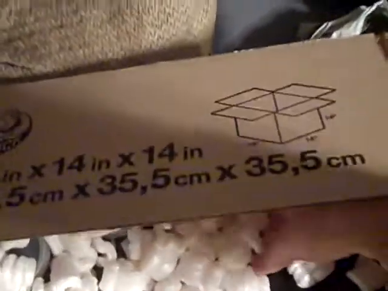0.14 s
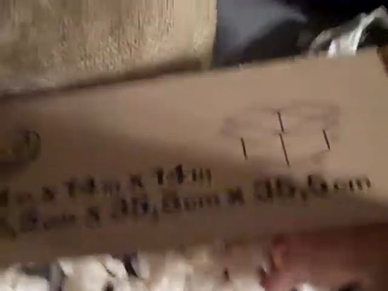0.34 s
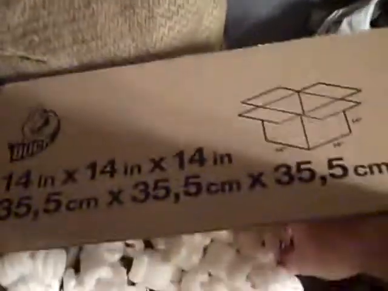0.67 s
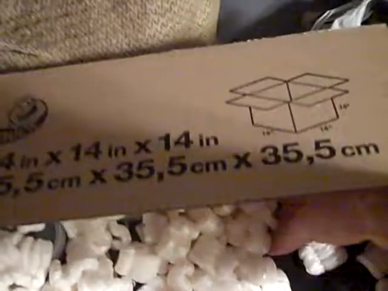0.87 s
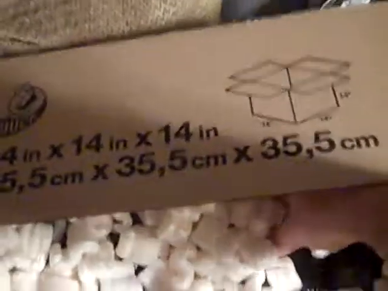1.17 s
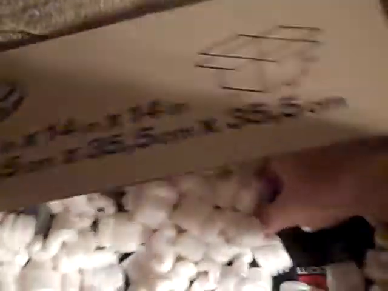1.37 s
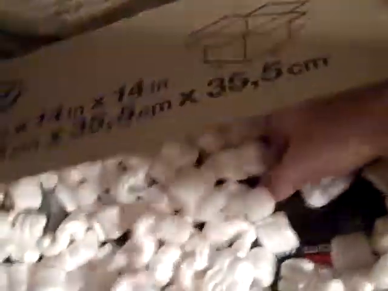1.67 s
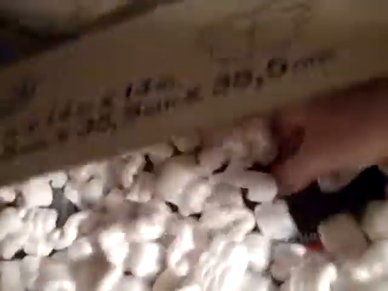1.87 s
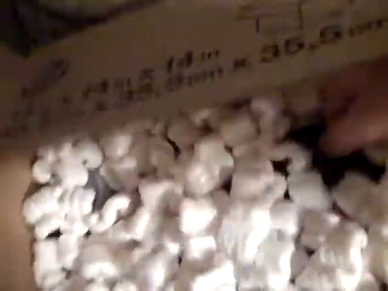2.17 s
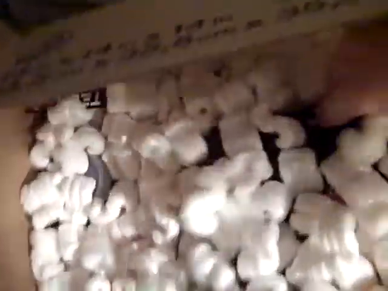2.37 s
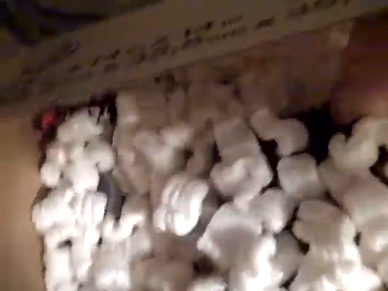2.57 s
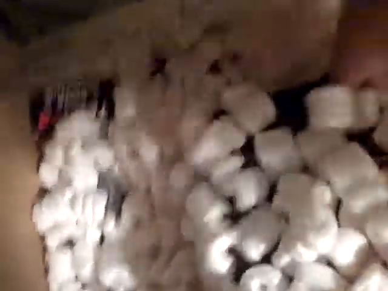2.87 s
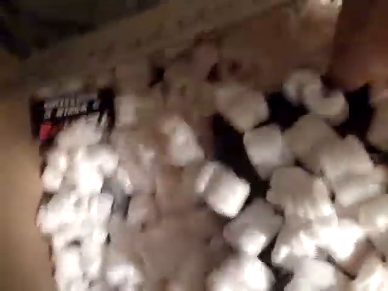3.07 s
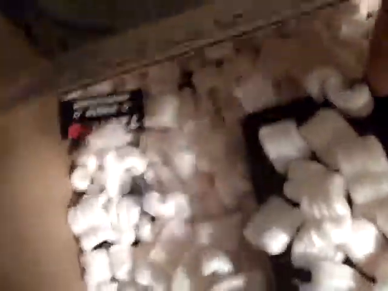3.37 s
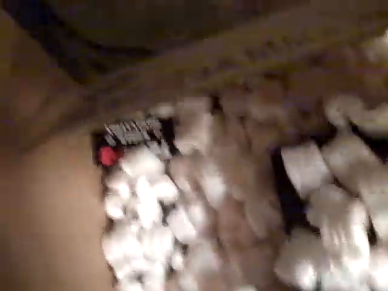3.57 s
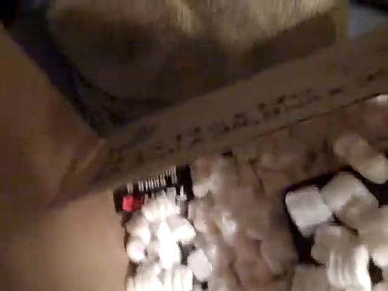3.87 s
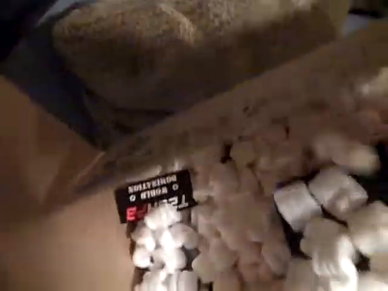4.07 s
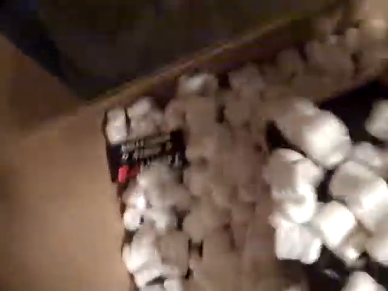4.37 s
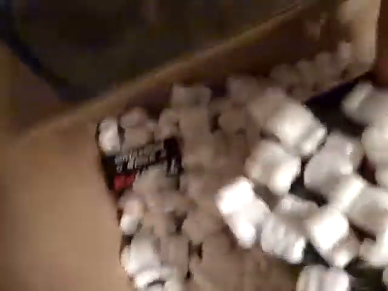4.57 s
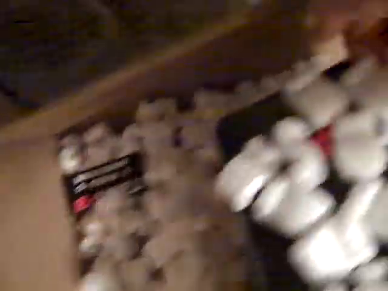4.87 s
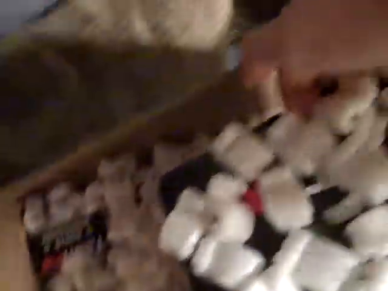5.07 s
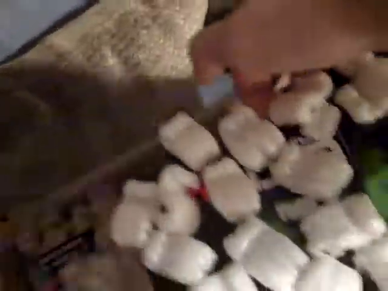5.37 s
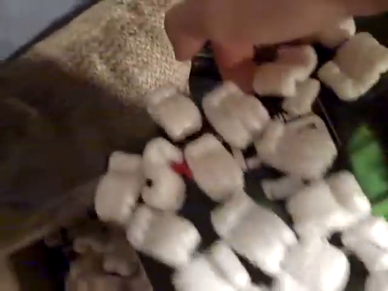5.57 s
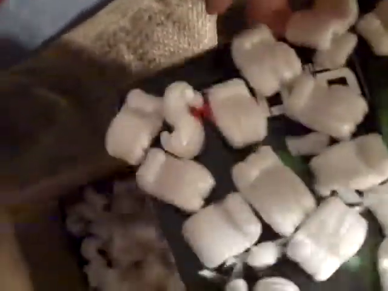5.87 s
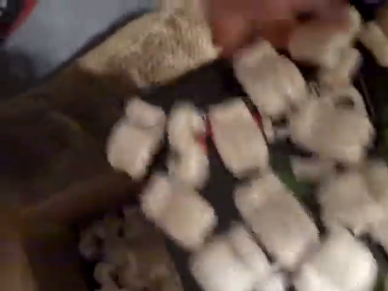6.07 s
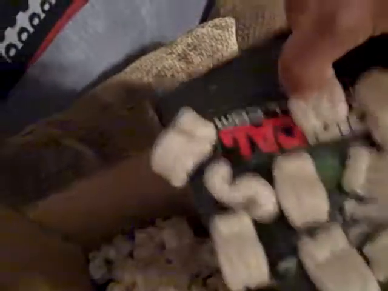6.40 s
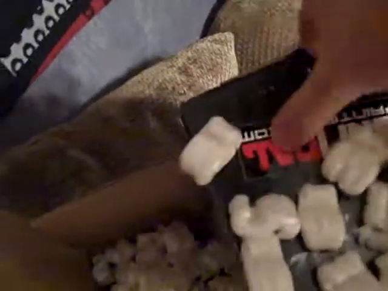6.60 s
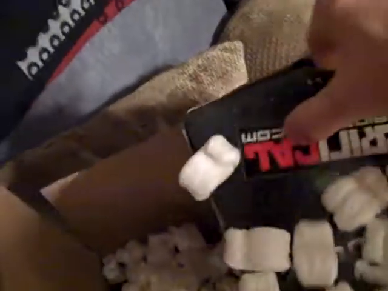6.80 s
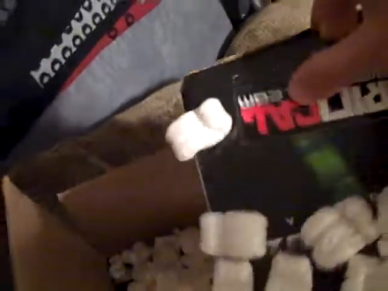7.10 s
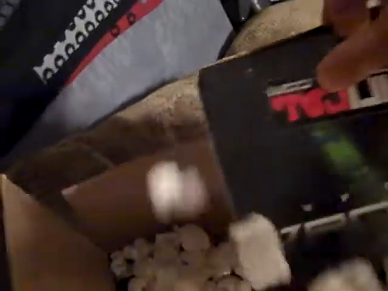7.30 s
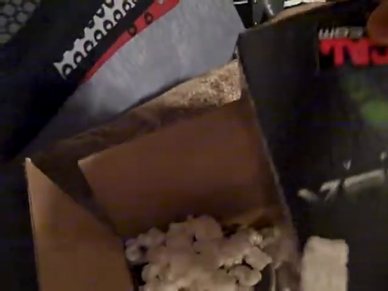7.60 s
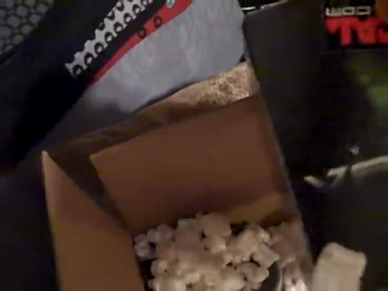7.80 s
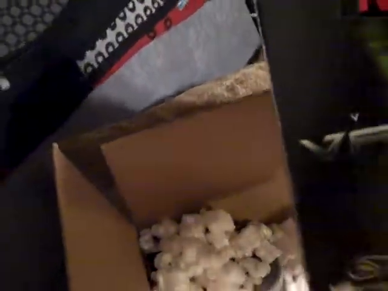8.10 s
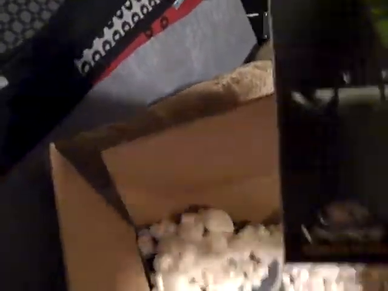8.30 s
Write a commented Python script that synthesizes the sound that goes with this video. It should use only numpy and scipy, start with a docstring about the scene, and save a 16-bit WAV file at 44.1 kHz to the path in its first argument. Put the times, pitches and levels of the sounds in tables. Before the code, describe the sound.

Close, dry rustling of loose foam peanuts in a cardboard box, swelling early, then breaking into knocks, squeaky slips and sparse clicks.

```python
"""A flat package drags through foam packing peanuts in a cardboard box, close to two small microphones.
Shoves over a steady drag drive dense random contacts: they scrape and hiss, the cavity colours, the walls boom.
Resonances struck by spikes and noise make the clicks, peanut taps and panel blows; decaying sines make the knocks.
Cardboard creaks and foam runs are trains of slips; wavering tones make a round low tap and two high squeaks.
Low grains rumble as the box sways, and a small room answers the single contacts."""
import sys
import numpy as np
from scipy import signal
from scipy.fft import rfft, irfft, next_fast_len
from scipy.io import wavfile
from scipy.ndimage import uniform_filter1d, map_coordinates

SR = 44100
rng = np.random.default_rng(int(sys.argv[2]) if len(sys.argv) > 2 else 0)


def dump_mix(stems):
    """Bounce the given channels to the path in sys.argv[1] as a 16-bit WAV at rate SR."""
    frames = np.atleast_2d(stems).T  # one column per channel
    limited = np.clip(frames, -1, 1)  # hard clip at full scale
    pcm = np.round(limited * 32767).astype(np.int16)
    wavfile.write(sys.argv[1], SR, pcm)


N = 372644
TIME = np.arange(N) / SR


def amp(db):
    """Decibels to gain."""
    return 10 ** (np.asarray(db) / 20)


def unit(x):
    """Scale to rms 1."""
    return x / np.sqrt(np.mean(x ** 2) + 1e-20)


def along(points, hz):
    """Read a curve of (Hz, value) points on a log frequency axis."""
    f, v = np.transpose(points)
    return np.interp(np.log(hz + 1), np.log(f + 1), v)


def curves(rows):
    """One value per sample for each column after the time."""
    s, *cols = np.transpose(rows)
    return [np.interp(TIME, s, c) for c in cols]


def filtered(x, response):
    """Filter x by a complex response of frequency, with zero padding for the tail."""
    n = x.shape[-1]
    m = next_fast_len(n + 4096)
    return irfft(rfft(x, m) * response(np.fft.rfftfreq(m, 1 / SR)), m)[..., :n]


def resonance(f, hz, width):
    """Causal response of one damped mode, with gain 1 at its pitch."""
    return 1j * f * width / (hz * hz - f * f + 1j * f * width)


def add(track, s, sound):
    """Mix a sound into a track at time s."""
    start = round(s * SR)
    track[..., start:start + sound.shape[-1]] += sound[..., :N - start]


# how alike the two ears are: pitch_hz [Hz], likeness [correlation]
EAR_LIKENESS = [(60, 0.39), (200, 0.87), (600, 0.85), (1200, 0.8), (2500, 0.7), (5200, 0.32), (9000, 0.12)]


def spread(pair, spectrum):
    """Colour two unrelated signals and share them between the ears: low mids most alike, treble apart."""
    def colour(f):
        turn = np.arccos(np.clip(along(EAR_LIKENESS, f), -1, 1)) / 2
        return amp(along(spectrum, f)) * np.array([np.cos(turn), np.sin(turn)])
    mid, side = filtered(pair, colour)
    return unit(np.array([mid + side, mid - side]))


def grains(rate, scatter_db, clump_db, clump_rate):
    """Two streams of tiny contacts of random size, in clumps as single peanuts catch and let go."""
    knots = rng.standard_normal(int(N * clump_rate / SR) + 4)
    clumps = amp(clump_db * map_coordinates(knots, [TIME * clump_rate], order=1))
    hit = rng.random((2, N)) < rate / SR
    size = amp(scatter_db * np.minimum(rng.standard_normal((2, N)), 2))
    sign = rng.choice([-1, 1], (2, N))
    return hit * size * sign * clumps / np.sqrt(rate)


def patches(pair, depth_db, cell_hz, cell_s):
    """Random brief spectral peaks and gaps make the noise patchy, at unchanged power."""
    hz, t, z = signal.stft(pair, SR, nperseg=512)
    field = rng.standard_normal((200, 1200))
    cells = np.meshgrid(hz / cell_hz, t / cell_s, indexing="ij")
    pattern = map_coordinates(field, cells, order=1, mode="wrap")
    gain = amp(np.interp(t, TIME, depth_db) * pattern)
    gain = gain / np.sqrt(np.mean(gain ** 2, axis=0))
    return signal.istft(z * gain, SR, nperseg=512)[1][:, :N]


# steady drag with loose foam sliding round the package: time_s [s], scrape_db [dB],
# then hiss_db, cavity_db, wall_db [dB relative to the scrape]
STEADY_DRAG = [(0, -52.5, 3.6, -11, -4.5), (.88, -57, 1, 1.5, -2), (1.2, -49, 1, -10, -15),
               (1.36, -49, 2.2, -5, -3), (1.6, -41, 4.6, -7, 0), (2.2, -41.5, 6.9, -1.5, -0.5),
               (2.62, -35.5, 4.2, -9, -10.5), (2.82, -41.5, 6.2, -3, -4), (3.2, -39, 6.1, -3, -7),
               (3.6, -45, 7.3, -1, -5.5), (3.9, -46.5, 7.5, -2.5, -7.5), (4.2, -47, 1.4, -5.5, -5.5),
               (4.28, -39.5, 5, -5, -5), (4.7, -37.5, 5.3, -4, -5), (5.25, -39, 2.7, -5.5, -5.5),
               (5.78, -36, 6.6, -3.5, -3.5), (6.03, -39, 11.8, -8, -13), (6.2, -39, 6.5, -5, -7),
               (6.52, -43, 11.3, -5, -2), (6.76, -48, 12.2, -9, -4.5), (7.12, -48.5, 8.1, -4.5, 0),
               (7.58, -50, 10.3, -5.5, -6.5), (7.82, -39.5, 8.1, -6, -14.5), (8.12, -49, 9.3, -8, -4.5),
               (8.45, -45.5, 4.6, -6, -10)]
# separate shoves, each swelling and fading: middle_s [s], length_s [s], scrape_db [dB],
# then hiss_db, cavity_db, wall_db [dB relative to the scrape]
SHOVES = [(0.064, 0.081, -32, 3.5, -11.5, -14), (0.193, 0.061, -36, 6, -13, -30),
          (0.318, 0.099, -42.5, 5.5, -10, -8), (0.463, 0.031, -40.5, 7, -12, -12),
          (0.653, 0.26, -43.5, 7.5, -11.5, -12), (0.987, 0.091, -36, 2, -12, -7),
          (1.065, 0.096, -34.5, -7, -6, -10), (1.162, 0.075, -37.5, 3.5, -5.5, -1.5),
          (1.435, 0.07, -37, -9, 0, -9), (1.518, 0.081, -32.5, -1.5, -4, -10),
          (1.64, 0.035, -30.5, 2, 0, -5), (1.702, 0.085, -23, 1, -0.5, -11),
          (1.844, 0.063, -21.5, -3, 0.5, -9), (1.983, 0.066, -22.5, -0.5, -4, -11.5),
          (2.117, 0.082, -31.5, 2.5, 0, -3), (2.261, 0.059, -32, 1, -3.5, -7),
          (2.41, 0.1, -24.5, -1, -1.5, -10.5), (2.536, 0.09, -29, -0.5, -3.5, -7.5),
          (2.731, 0.049, -29.5, 1, -2.5, -6), (2.88, 0.043, -24, 3.5, -9, -15.5),
          (2.992, 0.049, -30, 1, -7, -2.5), (3.129, 0.052, -35, 1, -4, -4),
          (3.286, 0.04, -38.5, -1, -18, -22), (3.446, 0.063, -39, 3.5, -10, -18),
          (4.063, 0.063, -43.5, 6, -15, 2), (4.372, 0.028, -39.5, 1, 2.5, 4),
          (4.54, 0.052, -37, 1.5, -8, -21), (4.612, 0.033, -39.5, 7, 2, 6),
          (4.666, 0.07, -41.5, 12.5, -16, -16), (4.768, 0.029, -32, -8, -0.5, 1),
          (4.904, 0.061, -36.5, 4.5, 2.5, 4), (5.071, 0.066, -40.5, 8, 3.5, -18),
          (5.353, 0.03, -36.5, -6, -9, -10), (5.524, 0.033, -27.5, 11, -2, -10),
          (5.571, 0.098, -28.5, 0, -8, 2), (5.633, 0.051, -28.5, 9, -0.5, -6),
          (5.695, 0.072, -33, 10.5, -7, 3.5), (6.423, 0.054, -47, 18.5, -11, -16),
          (6.566, 0.017, -47.5, 17, -15, -13), (6.922, 0.16, -48, 8, 0, 3), (7.485, 0.035, -44, 8, -7, -15),
          (7.883, 0.072, -42, 10, -8, -21), (8.25, 0.019, -43, 6.5, -7, -16),
          (8.327, 0.024, -36, 7.5, -8, -9), (8.361, 0.05, -36.5, 5.5, -6, -2.5)]
SHOVE_EDGE_DB = 5.5  # a shove is this much weaker half its length from the middle


def effort():
    """Levels in dB of scrape, hiss, cavity and wall: the power of every shove adds to the steady drag."""
    drag_db, *colour_db = curves(STEADY_DRAG)
    power = amp(drag_db + np.array([np.zeros(N), *colour_db])) ** 2
    for s, length, db, *colour in SHOVES:
        near = slice(*np.searchsorted(TIME, [s - 2 * length, s + 2 * length]))
        swell_db = db - SHOVE_EDGE_DB * (2 * (TIME[near] - s) / length) ** 2
        power[:, near] += amp(swell_db + np.array([0, *colour])[:, None]) ** 2
    return 10 * np.log10(power)


# the whole box lurches as the package is pulled free: start_s [s], level_db [dB of rumble]
BOX_LURCHES = [(1.17, -48), (4.04, -37), (4.61, -38), (4.75, -37), (5.48, -38), (5.55, -40), (6.87, -46),
               (8.33, -60)]
LURCH_RISE_S, LURCH_T60_S = 0.0083, 0.42
SWAY_DB = -17  # rumble that goes with any wall boom, relative to it


def sway(wall_db):
    """The whole box rumbles in uneven lumps: a little whenever its walls are pressed, more after a lurch."""
    level, t = amp(wall_db + SWAY_DB), np.arange(SR) / SR
    for s, db in BOX_LURCHES:
        add(level, s, np.minimum(t / LURCH_RISE_S, 1) * amp(db - 60 * t / LURCH_T60_S))
    lumps = grains(600, scatter_db=6.0, clump_db=6.0, clump_rate=29)
    return level * spread(lumps, [(20, -16), (45, -7), (70, -1.5), (110, 4.0), (170, -13), (350, -35)])


# spectral shapes of foam scrape, fine hiss, hollow cavity and box wall:
# each pitch_hz [Hz], level_db [relative dB per Hz]
SCRAPE_TONE = [(60, -54), (300, -31), (700, -7.5), (1000, -3.5), (1400, -0.5), (2000, 2), (2600, 2),
               (3400, 0), (4500, -3), (6000, -8.5), (9000, -37)]
HISS_TONE = [(100, -55), (1300, -28), (2500, -13.5), (4300, -4.5), (5400, -1.5), (6500, -2), (7800, 1),
             (9000, -1.5), (11000, -14.5)]
CAVITY_TONE = [(80, -57), (350, -17), (520, -4.5), (610, 2), (690, 3.5), (820, 0), (960, -5.5),
               (1300, -22.5)]
WALL_TONE = [(25, -50), (60, -17), (115, -19.5), (165, -4), (250, 1.5), (320, -1), (420, -4), (520, -6.5),
             (800, -32.5)]
MIDDLE_DIP_HZ, MIDDLE_DIP_WIDTH_HZ = 1360, 570
MIDDLE_DIP_SCALE_DB = 16  # scales the hiss's lead over the scrape into the depth of the dip


def rustle(scrape_db, hiss_db, cavity_db, wall_db):
    """Harder strokes make more contacts that scrape, hiss and shake the box; few contacts sound patchier."""
    rate = 5500 * amp(.6 * (scrape_db + 40))  # contacts per second
    sparse = np.clip((5500 / rate) ** 0.5, .75, 1.45)

    foam = grains(rate, scatter_db=2.6 * sparse, clump_db=1.86 * sparse, clump_rate=80)
    foam = patches(foam, depth_db=5.4 * sparse, cell_hz=261, cell_s=.029)
    scrape = spread(foam, SCRAPE_TONE)
    # a dip near 1.4 kHz thins the scrape, the more the hiss leads it
    middle_dip = np.clip(2 * (hiss_db - scrape_db) / MIDDLE_DIP_SCALE_DB - .9, 0, .65)
    middle = filtered(scrape, lambda f: resonance(f, MIDDLE_DIP_HZ, MIDDLE_DIP_WIDTH_HZ))
    scrape = amp(scrape_db - 1.86) * (scrape - middle_dip * middle)

    fine = grains(2 * rate, scatter_db=5.5, clump_db=2.0, clump_rate=80)
    fine = patches(fine, depth_db=3.0 * sparse, cell_hz=350.0, cell_s=.025)
    hiss = amp(hiss_db - 3.5) * spread(fine, HISS_TONE)

    hollow = grains(rate / 3, scatter_db=4.0, clump_db=3.5, clump_rate=70)
    hollow = patches(hollow, depth_db=2.7 * sparse, cell_hz=149.5, cell_s=.04)
    cavity = amp(cavity_db - 1.64) * spread(hollow, CAVITY_TONE)

    presses = grains(rate / 2, scatter_db=2.5, clump_db=3.0, clump_rate=50)
    wall = amp(wall_db - 0.1) * spread(presses, WALL_TONE)
    return scrape + hiss + cavity + wall + sway(wall_db)


def ticks(scrape_db, rate=55, scatter_db=2.5, gain_db=6, pitch_hz=2400, octaves=0.7, damping=0.36, t60=0.007):
    """Single peanuts tap their neighbours at random, each at its own pitch, as hard as the foam is moved."""
    track, t = np.zeros((2, N)), np.arange(SR // 50) / SR
    for _ in range(int(rate * N / SR)):
        s = rng.uniform(0, TIME[-1])
        size, tone = np.clip(rng.standard_normal(2), -2, 2)
        hz = pitch_hz * 2 ** (octaves * tone)
        push = (t == 0) + 0.33 * rng.standard_normal((2, len(t))) * amp(-60 * t / t60)
        tap = filtered(push, lambda f: resonance(f, hz, damping * hz))
        level = amp(scrape_db[int(s * SR)] + gain_db + scatter_db * size)
        add(track, s, level * tap / np.abs(tap).max())
    return track


# short wavering tones, a round low tap at 0.179 s, then two high foam squeaks:
# middle_s [s], half_length_s [s], pitch_hz [Hz], level_db [dB of the fundamental]
SHORT_TONES = [(0.179, 0.0045, 888, -33.5), (0.531, 0.006, 3400, -36), (0.772, 0.0016, 6600, -34)]


def wavering_tones(waver=0.085, octave_db=-3):
    """A round low tap, then two high foam squeaks: each a short, unsteady tone with its octave."""
    track, t = np.zeros(N), np.arange(-SR // 50, SR // 50) / SR
    for s, half, hz, db in SHORT_TONES:
        drift = unit(uniform_filter1d(rng.standard_normal(len(t)), size=16))
        phase = 2 * np.pi * np.cumsum(hz * (1 + waver * drift)) / SR
        tone = np.sin(phase) + amp(octave_db) * np.sin(2 * phase)
        add(track, s + t[0], amp(db) * np.exp(-(t / half) ** 2) * tone)
    return np.array([track, track])


# sharp clicks of foam and cardboard edges: snap_s [s], level_db [dB before gain_db], ring_hz [Hz]
EDGE_CLICKS = [(0.926, -23, 5500), (1.1389, -7, 2150), (1.4402, -7, 2830), (1.4655, -7.5, 2820),
               (1.6057, 0, 6460), (1.607, -4, 3270), (2.407, -4.5, 6000), (4.06, -16, 2500),
               (4.63, -14.5, 2900), (5.05, -15, 6400), (5.518, -7, 6200), (6.3092, -7, 6950),
               (6.534, -15, 4530), (6.625, -17.5, 1490), (6.84, -13, 6040), (6.8434, -13, 5830),
               (6.868, -14.5, 1550), (7.286, -29, 2200), (7.3647, -18, 6100), (7.456, -22, 6400),
               (7.462, -16, 6360), (7.581, -16.5, 6000), (7.898, -12.5, 5200), (7.903, -11.5, 6800),
               (7.9631, -9.5, 5200), (7.9744, -16, 5400), (8.058, -24, 5460), (8.2455, -22, 5000)]


def clicks(t60=0.017, damping=0.42, crack=0.49, spike=2, lead=0.0096, lead_db=-20, gain_db=-3):
    """An edge rubs for a moment, then snaps free: a spike and brief chatter through a broad resonance."""
    track, t = np.zeros((2, N)), np.arange(-SR // 50, SR // 20) / SR
    # the rub climbs 20 dB per lead time; the chatter dies away after the snap
    swell = np.where(t < 0, amp(lead_db + 20 * t / lead), amp(-60 * t / t60))
    for s, db, hz in EDGE_CLICKS:
        chatter = spread(rng.standard_normal((2, len(t))), [(100, 3.0), (11000, -6.0)]) * swell
        push = chatter + spike * (t == 0)

        def edge(f):
            ring = resonance(f, hz, damping * hz) + crack * resonance(f, 2800, 7500)
            return ring / (1 + .4j * f / hz)  # low-pitched contacts are also the softer ones
        snap = filtered(push, edge)
        add(track, s + t[0], amp(db + gain_db) * snap / np.abs(snap).max())
    return track


# cardboard creaks: middle_s [s], half_length_s [s], rate_hz [slips per s], level_db [dB at the middle]
CARDBOARD_CREAKS = [(1.075, 0.012, 203, -9.5), (1.436, 0.0095, 193, -12)]
# modes of the cardboard flap: pitch_hz [Hz], width_hz [Hz], level_db [relative dB]
FLAP_MODES = [(214, 200, 3), (450, 450, 5.5), (676, 310, 5.5), (1860, 260, -3.5)]


def creaks(count=7, quicken=0.023, jitter=0.029, soft_hz=750, harden=1.7, lowest_hz=110):
    """Cardboard judders on cardboard: slips swell and fade through flap modes, quickening and hardening."""
    def modes(f):
        return sum((-1) ** k * amp(level) * resonance(f, hz, width)
                   for k, (hz, width, level) in enumerate(FLAP_MODES))

    track = np.zeros(N)
    for s, half, rate, db in CARDBOARD_CREAKS:
        for step in np.arange(count) - count // 2:
            delay = (step - quicken * step ** 2 + jitter * rng.standard_normal()) / rate
            flap = filtered(signal.unit_impulse(SR // 20), modes)

            def contact(f):
                # the soft contact rounds each slip, and the small flap radiates little bass
                bass_loss = 1j * f / (lowest_hz + 1j * f)
                return (bass_loss / (1 + 1j * f / (soft_hz * harden ** step))) ** 2
            flap = filtered(flap, contact)
            add(track, s + delay, amp(db) * np.exp(-(delay / half) ** 2) * flap / np.abs(flap).max())
    return np.array([track, track])


# dull knocks on the box: start_s [s], level_db [dB before gain_db], wall_hz [Hz], t60_s [s]
BOX_KNOCKS = [(1.615, -17, 770, 0.053), (1.958, -10.5, 288, 0.019), (2.972, -17, 300, 0.023),
              (4.039, -19, 370, 0.035), (4.048, -27, 172, 0.048), (4.355, -23.5, 300, 0.025),
              (4.474, -20, 282, 0.031), (4.585, -23, 300, 0.046), (4.622, -19, 208, 0.039),
              (4.731, -19, 300, .04), (4.888, -25, 410, 0.045), (5.541, -10.5, 248, 0.11),
              (5.547, -15, 179, 0.067), (5.628, -12.5, 216, 0.087), (6.166, -20, 285, 0.051),
              (6.269, -25.5, 232, 0.037), (6.439, -20, 258, 0.032), (6.869, -12.5, 270, 0.041),
              (6.872, -21.5, 431, 0.05), (6.881, -26, 138, 0.09)]


def knocks(rise=0.00082, rattle_t60=0.1, rattle_db=-12, gain_db=-1):
    """A cardboard wall swings for a few cycles while the foam packed against it rattles."""
    track, t = np.zeros((2, N)), np.arange(SR // 5) / SR
    rattle_tone = [(30, -24), (110, -14.0), (400, -3.0), (750, -4), (1300, -11.5), (4000, -34.0), (11000, -46)]
    for s, db, hz, t60 in BOX_KNOCKS:
        swing = np.sin(2 * np.pi * hz * t) * amp(-60 * t / t60)
        rattle = spread(rng.standard_normal((2, len(t))), rattle_tone)
        rattle = amp(rattle_db - 60 * t / rattle_t60) * rattle
        add(track, s, amp(db + gain_db) * (1 - np.exp(-t / rise)) * (swing + rattle))
    return track


# loose peanuts drop on the hollow cardboard: start_s [s], level_db [peak dB before gain_db], ring_hz [Hz]
PEANUT_TAPS = [(3.2453, -21.5, 890), (3.286, -23, 674), (3.367, -31, 704), (3.459, -22.5, 680),
               (3.605, -28, 720), (3.625, -30, 840), (3.799, -26.5, 636), (3.9021, -24.5, 925),
               (3.9761, -16, 686), (4.354, -28, 610), (4.505, -21.5, 700), (5.209, -26.5, 670),
               (5.344, -29, 650), (6.615, -28, 790), (7.208, -22.5, 660), (7.397, -29, 696),
               (7.727, -23, 1040), (7.8625, -18.5, 750)]


def taps(t60=0.023, damping=0.67, chatter=0.14, soft_hz=2400, gain_db=0):
    """A light, soft peanut lands on the well-damped cardboard and chatters to rest."""
    track, t = np.zeros((2, N)), np.arange(SR // 16) / SR
    for s, db, hz in PEANUT_TAPS:
        push = (t == 0) + chatter * amp(-60 * t / t60) * rng.standard_normal((2, len(t)))
        tap = filtered(push, lambda f: resonance(f, hz, damping * hz) / (1 + 1j * f / soft_hz))
        add(track, s, amp(db + gain_db) * tap / np.abs(tap).max())
    return track


# quickening, fading stick-slip runs of foam: start_s [s], length_s [s], first_gap_s [s],
# level_db [dB before gain_db]
FOAM_RUNS = [(6.2013, 0.053, 0.0095, -6), (6.3788, 0.012, .0035, -3.5)]
SLIP_SHRINK, SLIP_LAST_GAP = .62, .35  # gaps shrink by this ratio towards this share of the first
SLIP_FADE_DB = 16  # level lost by the end of a run


def slips(t60=0.01, skin_hz=7350, skin_width_hz=1500, crack=0.2,
          rub_t60=0.033, rub_db=-15, gain_db=2.0, count=12):
    """Foam sticks and slips: each slip pings the stiff foam skin and leaves a short rub behind."""
    track, t = np.zeros((2, N)), np.arange(SR // 20) / SR
    gaps = SLIP_LAST_GAP + (1 - SLIP_LAST_GAP) * SLIP_SHRINK ** np.arange(count)
    steps = np.cumsum([0, *gaps])
    moments = [(start + delay, db - SLIP_FADE_DB * (delay / length) ** 2)
               for start, length, gap, db in FOAM_RUNS for delay in gap * steps if delay < length]
    rub_tone = [(200, -18), (900, -5.0), (1600, -14), (3200, -1), (7000, 0), (11000, -2.0)]
    for s, db in moments:
        pitch = skin_hz * (1 + 0.042 * rng.standard_normal())
        push = (t == 0) + 0.16 * rng.standard_normal((2, len(t))) * amp(-60 * t / t60)

        def skin(f):
            ring = resonance(f, pitch, skin_width_hz) + crack * resonance(f, 3700, 3500)
            return ring * resonance(f, 6300, 7300)
        ping = filtered(push, skin)
        rub = amp(rub_db - 1 - 60 * t / rub_t60) * spread(rng.standard_normal((2, len(t))), rub_tone)
        add(track, s, amp(db + gain_db) * (ping / np.abs(ping).max() + rub))
    return track


# blows on the package's flat panel as it comes clear: start_s [s], level_db [peak dB], chatter_t60_s [s]
PANEL_BLOWS = [(7.964, -14, 0.047), (8.322, -23, 0.17)]
# ringing modes of that panel: pitch_hz [Hz], level_db [relative dB]
PANEL_RING = [(560, -0.5), (1140, 1.5), (2290, -3), (3490, -0.5)]


def panel(width_hz=75, crack=0.21, chatter=0.28, soft_hz=2600):
    """The stiff panel takes a blow, chatters and rings briefly in its few modes."""
    def body(f):
        ring = sum(amp(db) * resonance(f, hz, width_hz) for hz, db in PANEL_RING)
        return (ring + crack * resonance(f, soft_hz / 2, soft_hz)) / (1 + 1j * f / soft_hz)

    track, t = np.zeros((2, N)), np.arange(SR // 10) / SR
    for s, db, t60 in PANEL_BLOWS:
        push = (t == 0) + chatter * amp(-60 * t / t60) * rng.standard_normal((2, len(t)))
        blow = filtered(push, body)
        add(track, s, amp(db) * blow / np.abs(blow).max())
    return track


def room(x, t60=0.12, wet_db=-12):
    """A small furnished room answers briefly: a decaying noise tail that starts 4 ms late."""
    t = np.arange(SR // 3) / SR
    tail = spread(rng.standard_normal((2, len(t))), [(200, -2.0), (2000, 2.5), (10000, -7.5)])
    tail = tail * amp(-60 * t / t60) * (t > .004)
    return x + amp(wet_db) * signal.fftconvolve(x, tail / np.linalg.norm(tail[0]), axes=1)[:, :N]


# spectral shape of the quiet room: pitch_hz [Hz], level_db [relative dB per Hz]
ROOM_TONE = [(25, -34), (70, -21), (150, 4.5), (250, -11), (500, -14), (1500, -21), (7000, -30),
             (11000, -30)]


def scene():
    """Rustle and single contacts over the quiet of the room."""
    scrape_db, hiss_db, cavity_db, wall_db = effort()
    quiet = amp(-66.0) * spread(rng.standard_normal((2, N)), ROOM_TONE)
    contacts = ticks(scrape_db) + wavering_tones() + clicks() + creaks()
    contacts = contacts + knocks() + taps() + slips() + panel()
    return rustle(scrape_db, hiss_db, cavity_db, wall_db) + room(contacts) + quiet


# microphone port resonances, left then right: pitch_hz [Hz], width_hz [Hz], boost_db [dB]
PORT_RINGS = [(7100, 1020, 8), (6100, 1000, 7)]
# treble response of each port, left then right: pitch_hz [Hz], level_db [dB]
PORT_TREBLE = [
    [(7500, 1), (8600, -3), (10000, -6), (11500, -30)],
    [(6300, 1.5), (7500, -3.5), (8600, -19), (11500, -29)],
]
TOP_HZ = 11200  # upper band edge


def record(dry):
    """Each port rings at its own pitch; the left is later and leaner in bass; peaks clip; the band ends."""
    def ports(f):
        rings = [(1 + (amp(db) - 1) * resonance(f, hz, width)) * amp(along(fall, f))
                 for (hz, width, db), fall in zip(PORT_RINGS, PORT_TREBLE)]
        tilt = amp(along([(50, -7.0), (200, -0.84), (2000, 0.0), (4500, 1.0)], f))
        delay = np.exp(-2j * np.pi * f * 2.4e-5)  # 24 microseconds
        return np.array([rings[0] * tilt * delay, rings[1]])
    clipped = np.clip(filtered(dry, ports), -1, 1)
    return filtered(clipped, lambda f: 1 / (1 + (f / TOP_HZ) ** 80))


dry = scene()
out = record(dry)
dump_mix(out)
```